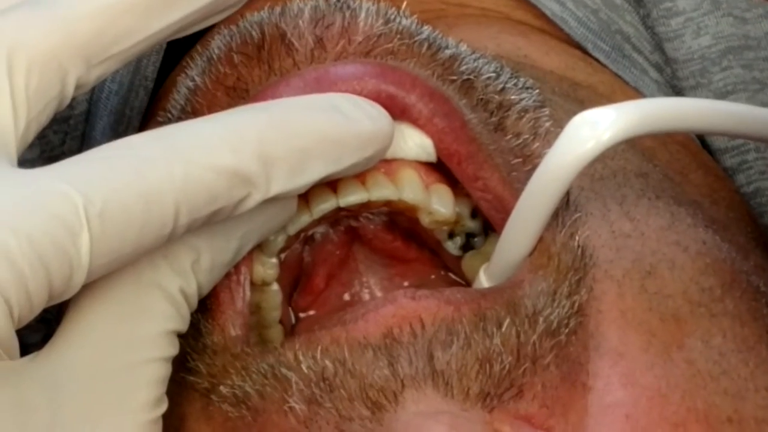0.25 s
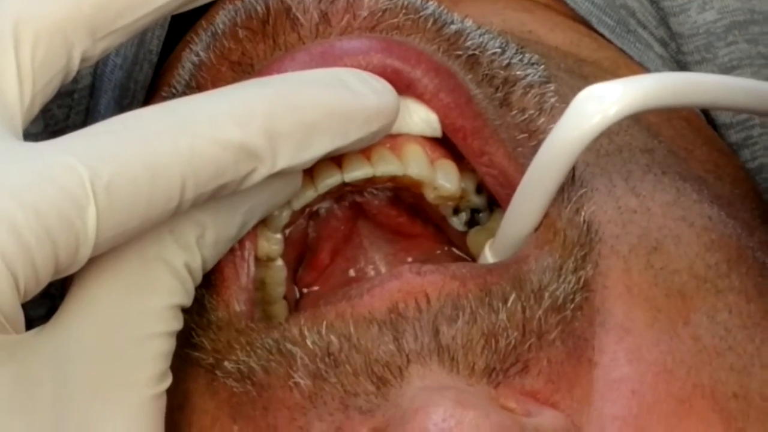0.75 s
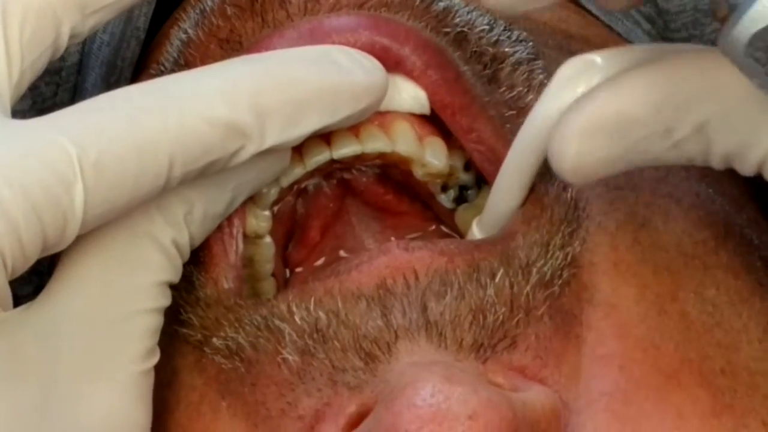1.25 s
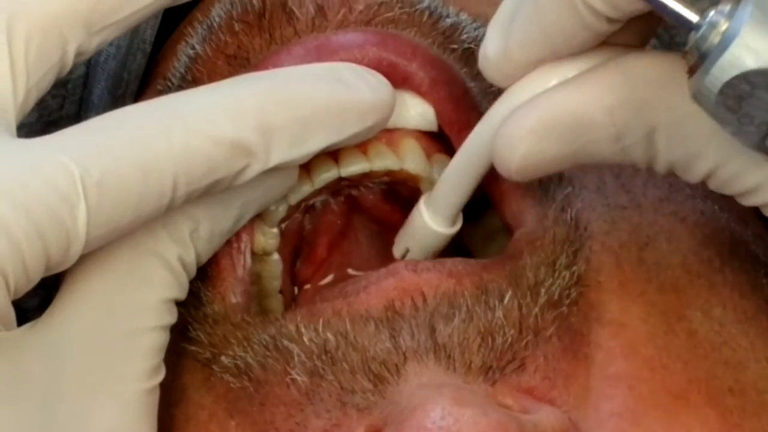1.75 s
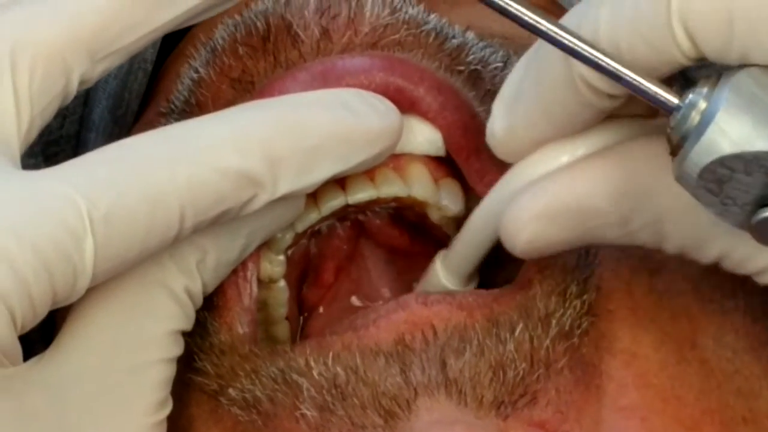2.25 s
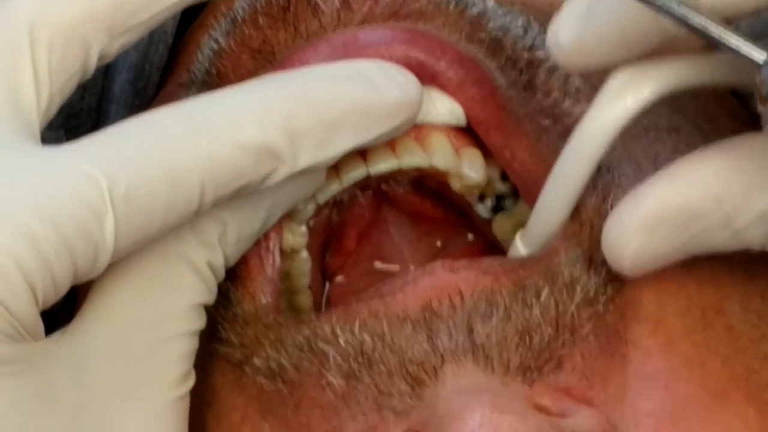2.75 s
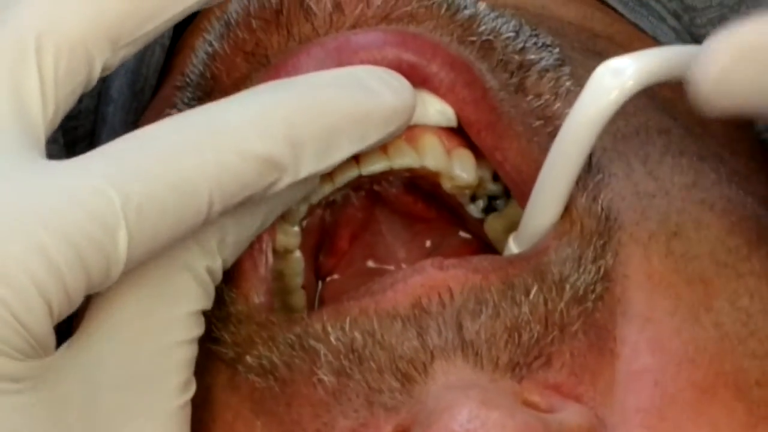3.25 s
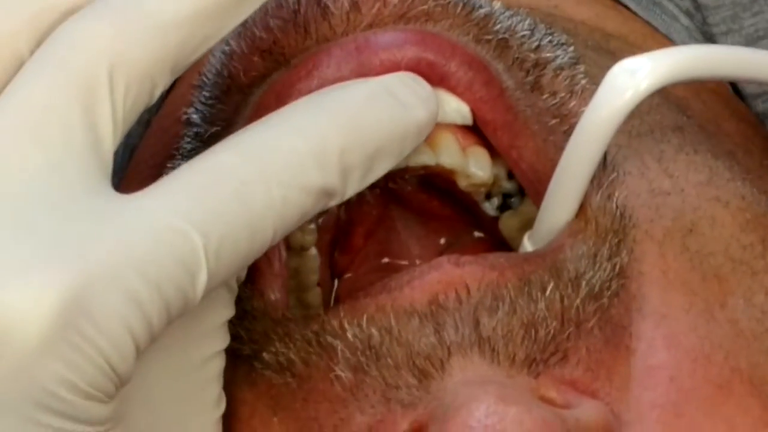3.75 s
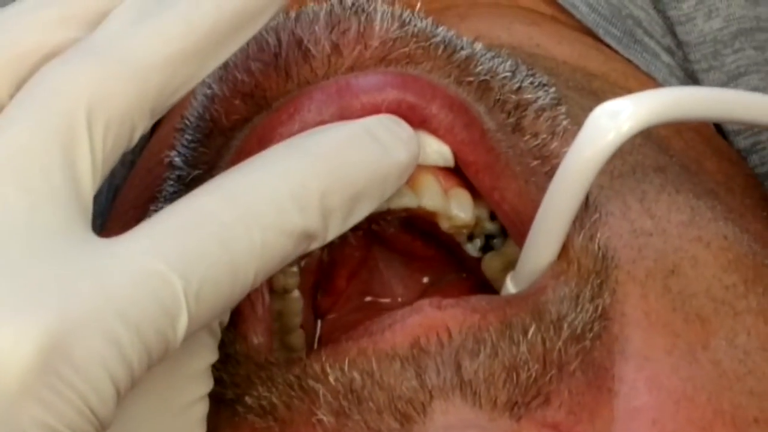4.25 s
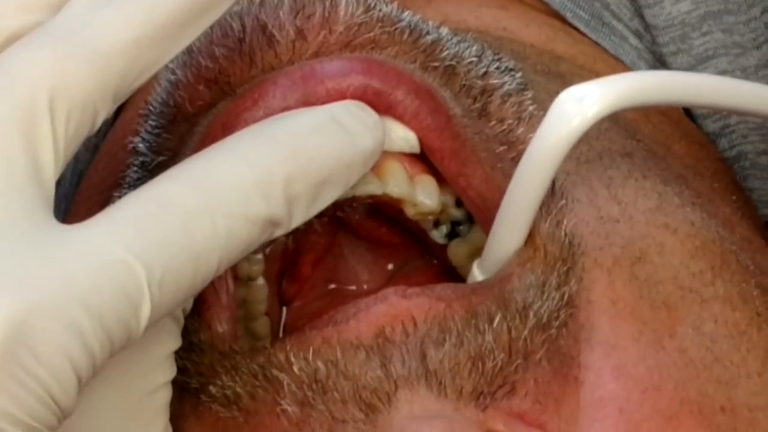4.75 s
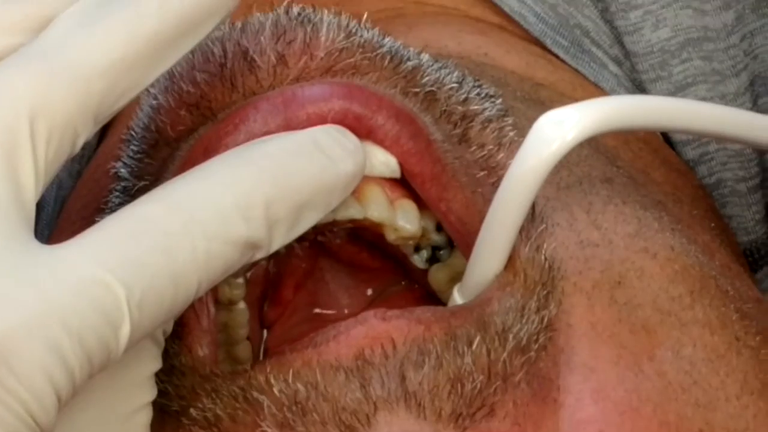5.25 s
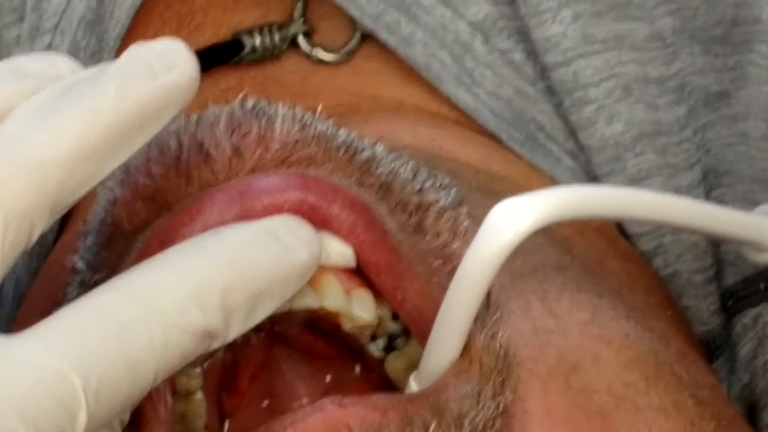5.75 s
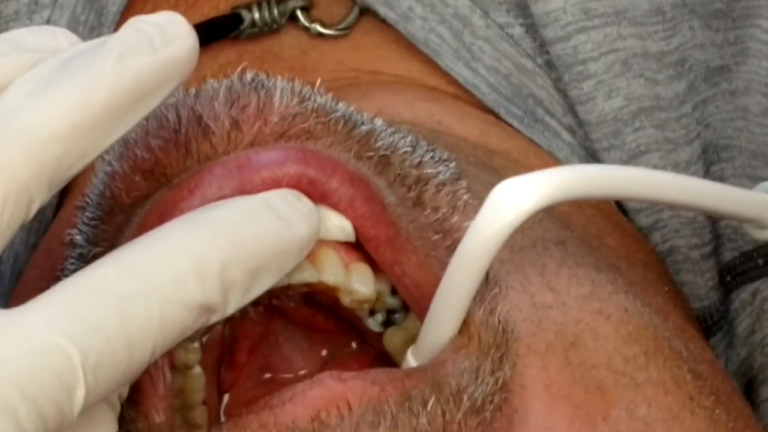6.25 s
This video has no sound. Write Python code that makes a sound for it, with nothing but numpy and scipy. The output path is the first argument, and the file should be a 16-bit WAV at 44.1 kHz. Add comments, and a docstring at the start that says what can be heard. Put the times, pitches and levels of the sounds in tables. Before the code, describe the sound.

Continuous dental suction in a small clinic room, heard very near. Breathy high hiss and a nasal mid-pitched drone run without pause, flecked with saliva crackles. Around two seconds the moved tip shifts in timbre and a low rumble pulses twice; afterwards the sound steadies, slightly duller and wavering. Soft handling thuds cluster after three seconds, over quiet beating fan hum and room rumble.

```python
"""A suction tube hisses in an open mouth: filtered noise stands for air exciting the cavities of mouth and tube.
The tip starts in the cheek over a low drone, is gripped and lifted, is laid back and settles, and each place
has its own colour. Saliva films pop throughout; a low hum swells twice near the lift; fingers bump the
hand-held microphone pair around the move and faintly near the end. Beating sines for fans and a noise rumble
lie behind; hiss, room and fans swell and sink together, the drone with them in part."""
import sys
import numpy as np
from scipy import signal
from scipy.fft import rfft, irfft
from scipy.io import wavfile

SR = 44100
rng = np.random.default_rng(int(sys.argv[2]) if len(sys.argv) > 2 else 0)


def put_to_file(sound):
    """Save the sound as 16-bit audio at rate SR, in the file named by the first command-line argument."""
    columns = np.atleast_2d(sound).T  # one column per channel
    safe = np.clip(columns, -1, 1)
    whole_steps = np.round(safe * 32767)
    wavfile.write(sys.argv[1], SR, whole_steps.astype(np.int16))


N = 287091   # length in samples

# Path of the suction tip. Each row: time in seconds, place (0 cheek, 1 gripped, 2 lifted, 3 laid back,
# 4 settled), hiss level in dB before echoes, dips and swell.
TIP_PATH = [(0, 0.035, -25), (0.3, 0.03, -27.5), (0.85, 0.026, -27), (1.5, 0.067, -27.5),
            (1.63, 0.63, -33.5), (1.8, 1.06, -34.5), (1.98, 1.87, -30.5), (2.33, 2.15, -30),
            (2.47, 2.74, -34.5), (2.62, 2.77, -30), (2.88, 3.14, -32), (3.15, 3.14, -33.5),
            (3.45, 3.8, -32), (5.0, 4.01, -31), (6.51, 3.67, -32)]
# Lowest resonances of tube and mouth with the tip out of the cheek. Each row: pitch in Hz, width of each of two
# resonators in Hz, relative centre level in dB, relative side level in dB, left-right lean in dB.
DRONE_MODES = [(1139, 122, 0.5, -38, 0.5), (1242, 285, 0, -23, 0.74), (1504, 275, -7.5, -16.5, 0.97),
               (1712, 425, -13.5, -29, 1), (2070, 1170, -37, -21.5, 0.1)]


def amp(db):
    """Decibels to amplitude factor."""
    return 10 ** (np.asarray(db) / 20)


def rms_one(x):
    """Scale to an rms of 1."""
    return x / np.sqrt(np.mean(x ** 2) + 1e-20)


def in_time(rows):
    """Join the breakpoints of each column with straight lines over the scene."""
    s, *columns = np.transpose(rows)
    return [np.interp(np.arange(N) / SR, s, c) for c in columns]


def drift(rate_hz, size=N):
    """Random motion of rms 1: noise through two equal one-pole lowpasses, computed every 40 samples."""
    r = np.exp(-80 * np.pi * rate_hz / SR)
    noise = rng.standard_normal(N // 40 + 2002)
    slow = signal.lfilter([1], [1, -2 * r, r * r], noise)[2000:]   # skip the run-in
    return np.interp(np.arange(size) / 40, np.arange(len(slow)), rms_one(slow))


def hiss():
    """Air turbulence at the tip: broad jet noise under cavity colours that fade from place to place."""
    # Resonances for each place of the tip, and the broad noise of the air jet. Each row: pitch in Hz, width of
    # each of two resonators in Hz, relative centre level in dB, relative side level in dB, left-right lean in dB.
    cheek_modes = [(3360, 680, -11.5, -26, 9), (3848, 80, -8, -4, 0), (4430, 480, -41, -8.5, 2),
                   (4510, 68, -9.5, -11, 5), (5253, 600, -1.5, -8.5, 5.5), (5450, 85, -3, -17, 2),
                   (5750, 430, -5, -17, -0.5), (6750, 180, -12, -11, 10), (7340, 1400, -14, -18, 6),
                   (8240, 410, -11.5, -13, -4), (8960, 650, -10.5, -8, 14), (10050, 270, -12.5, -18, 5),
                   (10990, 570, -10, -12, 12), (12500, 900, -22, -24, 0), (13670, 450, -10.5, -12, -10),
                   (14850, 820, -9, -9, -14)]
    gripped_modes = [(2730, 450, -43, -26, 5), (3240, 200, 0.5, -35, -0.0), (3520, 510, -2, -15, -1),
                     (4580, 770, -15, 2, 3), (5740, 980, 0.5, -10, 5), (6660, 530, -11, -2, 8.1),
                     (7430, 270, -2, -13.8, 4.5), (9800, 1200, -11, -7, 6), (10800, 1000, -1, -4, 13),
                     (11800, 550, -17, -16.5, -3.5), (13300, 1100, -4, -7, -1), (14500, 550, -9, -8, -9),
                     (15000, 800, -4, -6, -14)]
    lifted_modes = [(3345, 440, -0.5, -35, -2), (4320, 300, -1, 6, 1), (5760, 830, 3, -5, 1),
                    (6850, 520, -10, 1, 20), (7420, 1550, -0.5, -8, 9), (8600, 1300, -19, -4, 3),
                    (9000, 580, -5, -7.9, 8), (9700, 380, -9, -7, -1), (10400, 890, -1, -3, 13),
                    (12200, 750, -8, -15.8, -2.6), (13200, 440, -20, -13, -3), (13100, 500, -12, -10, -0.5),
                    (14400, 530, -1, 0, -7)]
    laid_back_modes = [(3600, 1430, -7.5, -42, 6), (4130, 500, -33, -1.5, 11), (5256, 650, 4, -2, 6),
                       (5750, 1900, -19, -12, -7), (6400, 1130, -6, -14, 2), (8450, 2300, -11.5, -6, 3.5),
                       (9200, 610, -7, -7, 6), (11100, 620, -10, -9.0, 3), (12070, 520, -27, -17.4, -3.3),
                       (12550, 540, -8, -15, -0.7), (14580, 1400, -1, -2, -12)]
    settled_modes = [(2620, 240, -21.5, -31, 23), (3320, 740, -15.5, -35, 13), (3871, 133, -7, -16, 1),
                     (3910, 360, -26, -14, 4), (4220, 330, -5, -3, 3), (5170, 605, 1.2, -8, 2.5),
                     (5640, 120, -11, -16, 1), (5760, 390, -18.5, -9, -13), (6830, 100, -8, -16, 3),
                     (7360, 500, -12.5, -22, -3), (8390, 1600, -10.5, -12, 2.5),
                     (10480, 400, -16.5, -17, 6), (10990, 380, -12.5, -15, 3), (12080, 460, -12.5, -12, -7),
                     (12600, 510, -15, -16, -4), (13860, 550, -12, -14, 1), (14700, 1000, -15, -13, -5)]
    jet_bands = [(6370, 920, -22, 3, -6), (7890, 1300, 3.5, -1, 6), (10000, 3200, 0, 0, 2.5),
                 (12500, 3700, -7, -6, 1), (15300, 1500, -16, -7, -8)]

    place, level_db = in_time(TIP_PATH)
    out = amp(-9) * cavities(jet_bands, flicker_db=0.5, rate_hz=6.1, own=0.7)
    places = [cheek_modes, gripped_modes, lifted_modes, laid_back_modes, settled_modes]
    for k, modes in enumerate(places):
        share = np.clip(1 - np.abs(place - k), 0, 1)
        heard = share > 0
        colour = cavities(modes, flicker_db=0.56, rate_hz=15, own=2.03, size=heard.sum(), laid_down=k > 2)
        out[:, heard] += np.sqrt(share[heard]) * colour
    return amp(level_db) * nearby(out, place)


def cavities(modes, flicker_db, rate_hz, own, size=N, laid_down=False):
    """Turbulence through flickering resonances as (centre, side), centre rms 1; a shared part leans left or right."""
    # Quarter-cycle link of side to centre, ahead if positive. Each row: pitch in Hz, share before the tube
    # is laid back, share from then on.
    phase_lead = [(1500, 0, 0), (2000, .5, .5), (3300, 0, 0), (3900, -.5, -.5), (4900, .6, .6),
                  (5500, .3, .4), (7000, -.5, -.4), (8200, .6, .6), (9000, 0, 0), (9700, -.8, -.6),
                  (11200, -.8, -.3), (12500, -.5, .6), (14000, -.6, .5), (15500, 0, 0)]

    out, together = np.zeros((2, size)), drift(rate_hz, size)
    white = rng.standard_normal((2, N))
    ahead = irfft(1j * rfft(white[0]), N)   # every pitch a quarter cycle early
    lead_hz, early_share, late_share = np.transpose(phase_lead)
    lead_share = late_share if laid_down else early_share
    for k, (hz, width_hz, centre_db, side_db, lean_db) in enumerate(modes):
        q = np.interp(hz, lead_hz, lead_share)
        pair = np.array([white[0], q * ahead + np.sqrt(1 - q * q) * white[1]])
        pair = np.roll(pair, 9973 * k, axis=1)[:, :size]   # a different stretch of noise for each mode
        one, other = resonance(pair, hz, width_hz)
        # share of the centre noise in the side that gives the lean
        lean = np.tanh(lean_db * np.log(10) / 20)
        shared = np.clip(lean * np.cosh((centre_db - side_db) * np.log(10) / 20), -.99, .99)
        side = shared * one + np.sqrt(1 - shared ** 2) * other
        gain = amp(flicker_db * (together + own * drift(rate_hz, size)))
        out += gain * [amp(centre_db) * one, amp(side_db) * side]
    return out / np.std(out[0])


def resonance(x, hz, width_hz):
    """Two equal resonators in a row, gain 1 on top."""
    b, a = signal.iirpeak(hz, hz / width_hz, SR)
    return signal.lfilter(np.convolve(b, b), np.convolve(a, a), x)


def nearby(x, place):
    """Short reflections ripple the spectrum finely; the ripple glides with the tip and wanders."""
    # Face, hands and lamp reflect the hiss. Each row: delay in seconds with the tip in the cheek, level in dB.
    reflections = [(.0013, -16), (.0027, -16), (.0046, -16), (.0071, -18)]
    stretch_per_place, wander_s = .04, .00002

    out, t = x.copy(), np.arange(N) / SR
    for delay_s, level_db in reflections:
        late = t - delay_s * (1 + stretch_per_place * place) - wander_s * drift(0.63)
        out += amp(level_db) * np.array([np.interp(late, t, v) for v in x])
    return out


def drone(swell_db):
    """The lowest resonances of tube and mouth crossfade to another set as the tip leaves the cheek."""
    # Resonances with the tip in the cheek. Each row: pitch in Hz, width of each of two resonators in Hz,
    # relative centre level in dB, relative side level in dB, left-right lean in dB.
    cheek_drone = [(1196, 290, -11.5, -38, 0.5), (1257, 168, 1, -22, 0.67), (1475, 335, -6, -15.5, 0.97),
                   (1780, 260, -15, -32, 1), (2250, 1000, -29, -22.5, 0.1)]
    base_db, swell_share = -33, 0.81

    moved = np.clip(in_time(TIP_PATH)[0], 0, 1)
    in_cheek = cavities(cheek_drone, flicker_db=0.9, rate_hz=110, own=0.75)
    in_open = cavities(DRONE_MODES, flicker_db=0.9, rate_hz=110, own=0.75)
    level_db = base_db + swell_share * swell_db + 0.91 * drift(5.6)
    return amp(level_db) * (np.sqrt(1 - moved) * in_cheek + np.sqrt(moved) * in_open)


def pops(per_s, level_db):
    """Saliva films burst at the tip and ring the drone resonances: a few loud ones, many small."""
    # Loud bursts. Each row: time in seconds, peak in dB before the dips.
    loud_bursts = [(0.7948, -21), (1.263, -25), (1.565, -22), (1.7917, -25), (1.8634, -19.5), (2.028, -22),
                   (2.554, -24), (2.7809, -19), (2.8349, -21), (3.2461, -23), (3.7189, -24),
                   (3.8035, -23.5), (4.0483, -19.5), (4.376, -25), (4.412, -21), (4.48, -30), (4.8693, -18),
                   (5.361, -19), (5.5361, -20), (5.6868, -28), (5.804, -19), (5.84, -19)]

    sizes = amp(level_db + 1.5 * np.minimum(rng.exponential(1, N), 3)) * rng.choice([-1, 1], N)
    clicks = sizes * (rng.random(N) < per_s / SR)
    for s, peak_db in loud_bursts:
        clicks[round(s * SR)] = amp(peak_db)
    pulse = signal.unit_impulse(SR // 20)
    ring = np.zeros(len(pulse))
    for k, (hz, width_hz, centre_db, _, _) in enumerate(DRONE_MODES):
        ring += (-1) ** k * amp(centre_db) * resonance(pulse, hz, width_hz)   # alternating sign
    ringing = signal.fftconvolve(clicks, ring / np.abs(ring).max())[:N]
    return ringing * amp([[0], [-18]])   # centre, side


def dips(centre, side):
    """Dips at some pitches in centre and side, then changing gaps in the centre."""
    # Fixed dips of each. Each row: pitch in Hz, width in Hz, depth in dB.
    centre_dips = [(1061, 112, -8.5)]
    side_dips = [(3370, 190, -41), (1110, 110, -10)]
    return np.array([changing_gaps(reject(centre, centre_dips)), reject(side, side_dips)])


def reject(x, nulls):
    """Steep-sided dips of limited depth."""
    bins = np.fft.rfftfreq(N, 1 / SR)
    loss_db = sum(depth_db / (1 + (2 * (bins - hz) / width_hz) ** 4) for hz, width_hz, depth_db in nulls)
    return irfft(rfft(x) * amp(loss_db), N)


def changing_gaps(x):
    """Narrow bands drop out; pitches, widths and depths change along a table, with random edges and partial fills."""
    # Gaps in the spectrum. Each row: position on the place scale of the tip path, then for each of four gaps
    # its pitch in Hz, mean width in Hz and full depth in dB.
    gap_table = [(0, 2250, 380, -55, 4220, 400, -55, 4900, 200, -1, 6330, 300, -14),
                 (1, 2280, 440, -55, 4150, 320, -55, 4850, 180, -20, 6330, 300, -18),
                 (2, 2280, 440, -55, 4120, 280, -50, 4900, 220, -40, 6300, 220, -16),
                 (2.4, 2280, 420, -55, 4340, 520, -55, 4900, 200, -1, 6330, 250, -10),
                 (4, 2200, 300, -55, 4350, 520, -55, 4900, 200, -1, 6350, 330, -35)]
    # One value for each gap: share of the time in which it is partly filled.
    filled_shares = [.01, .1, .4, .3]
    edge_wander, wander_hz = .13, 7.   # edge motion as a share of the width, and its rate

    hz, s, spectra = signal.stft(x, SR, nperseg=1024)
    at = np.minimum((s * SR).astype(int), N - 1)
    position, *columns = np.transpose(gap_table)
    position_now = in_time(TIP_PATH)[0][at]
    now = [np.interp(position_now, position, c) for c in columns]
    loss_db = 0
    for centre_hz, width_hz, depth_db, filled in zip(now[::3], now[1::3], now[2::3], filled_shares):
        low = centre_hz - .5 * width_hz * np.exp(2 * edge_wander * drift(wander_hz)[at])
        high = centre_hz + .5 * width_hz * np.exp(2 * edge_wander * drift(wander_hz)[at])
        chance = drift(wander_hz)[at]
        # a filled gap keeps a fifth of its depth
        is_open = np.clip(8 * (chance - np.quantile(chance, filled)), .2, 1)
        shape = 1 / (1 + ((2 * hz[:, None] - low - high) / (high - low)) ** 8)
        loss_db = loss_db + is_open * depth_db * shape
    return signal.istft(spectra * amp(loss_db), SR)[1][:N]


def bumps():
    """Fingers push the casing and its ports in opposite directions: damped thuds, mostly in the side."""
    # Fingers shift on the casing. Each row: time in seconds, strength in dB before filtering.
    finger_shifts = [(1.279, -34), (2.958, -38), (2.999, -32), (3.026, -33), (3.056, -32), (3.092, -32),
                     (3.125, -28), (3.245, -22), (3.27, -31), (3.3, -25), (3.506, -24), (3.53, -33),
                     (3.56, -35), (3.605, -34), (3.627, -34), (3.65, -31), (3.665, -28), (3.7, -35),
                     (3.745, -35), (3.785, -35), (3.882, -21), (3.912, -23), (5.09, -40), (5.32, -40),
                     (5.39, -35), (5.53, -39), (5.78, -33), (6.41, -40)]
    thud_hz, t60_s, tick_db = 126, 0.042, 14   # the tick is the bare contact under each thud

    clicks = np.full(N, 1e-18)
    for s, level_db in finger_shifts:
        clicks[round(s * SR)] = amp(level_db)
    r, w = amp(-60 / (t60_s * SR)), 2 * np.pi * thud_hz / SR
    thud = signal.lfilter([0, np.sin(w)], [1, -2 * r * np.cos(w), r * r], clicks)
    thud -= amp(tick_db) * clicks
    thud = signal.sosfilt(signal.butter(2, [56, 640], "band", fs=SR, output="sos"), thud)
    return thud * amp([[-18], [1.5]])   # centre, side


def hum():
    """A narrow band of noise around a gliding low pitch, its side a quarter cycle from its centre."""
    # A low rumble swells twice and goes. Each row: time in seconds, pitch in Hz, centre level in dB.
    rumble_path = [(0, 191, -80), (1.7, 190, -75), (1.97, 190.3, -52), (2.1, 190, -54), (2.25, 191.7, -44),
                   (2.36, 199.8, -52), (2.5, 200, -75), (6.51, 202, -80)]

    hz, level_db = in_time(rumble_path)
    phase = 2 * np.pi * np.cumsum(hz) / SR
    a, b = drift(14), drift(14)   # these set the width of the band
    centre = a * np.sin(phase) + b * np.cos(phase)
    side = a * np.cos(phase) - b * np.sin(phase)
    return amp(level_db) * [centre, amp(-5.0) * side]


def fans():
    """Three fans as slowly wandering sines that beat, with some of each in the side."""
    # Fan tones. Each row: distance from the loudest in Hz, share of its drift, centre level in dB before the swell.
    fan_tones = [(-12.5, 0.53, -54), (0, 1, -48.5), (7.5, 0.4, -52.5)]
    # The loudest fan drifts in speed. Each row: time in seconds, pitch in Hz.
    speed_path = [(0.0, 457.5), (1.12, 458.8), (4.49, 455.7), (6.25, 460.8), (6.5, 459.4)]

    out, (lead_hz,) = np.zeros((2, N)), in_time(speed_path)
    for apart_hz, share, level_db in fan_tones:
        hz = lead_hz.mean() + apart_hz + share * (lead_hz - lead_hz.mean())
        phase = 2 * np.pi * np.cumsum(hz) / SR + rng.uniform(0, 2 * np.pi)
        gain = np.sqrt(2) * amp(level_db + 1.05 * drift(6.1))
        out += gain * [np.sin(phase), amp(-7.0) * np.cos(phase)]
    return out


def room(level_db):
    """Ventilation rumble as shaped noise, with standing waves as narrow resonances."""
    # Rumble spectra of centre and side. Each row: pitch in Hz, relative density in dB per Hz.
    centre_spectrum = [(15, -66), (25, -35), (86, -16.5), (140, -13), (190, -9.5), (273, -8.5),
                       (346, -11.5), (381, -10.5), (453, -7.5), (491, -7.5), (1100, -12), (1430, -42),
                       (2420, -120)]
    side_spectrum = [(15, -57), (25, -33), (86, -5.5), (248, -11), (419, -7.5), (453, -10), (491, -9),
                     (539, -14.5), (1100, -19.5), (1430, -53), (2420, -120)]
    # Standing waves. Each row: pitch in Hz, width of each of two resonators in Hz, relative centre level in dB,
    # relative side level in dB, left-right lean in dB.
    standing_waves = [(175.6, 10.5, -11, -15.5, 0), (240.3, 13, -12, -13, -5), (340.4, 39, -13, -17, -3),
                      (621.5, 12.7, -15.5, -19, 15), (956, 45, -16, -29, 0)]

    rumble = np.array([coloured(centre_spectrum), amp(-7.5) * coloured(side_spectrum)])
    waves = cavities(standing_waves, flicker_db=0.5, rate_hz=0.33, own=0.5)
    return amp(level_db) * (amp(3.0) * rumble + amp(-1.0) * waves)


def coloured(spectrum):
    """Steady noise of a given spectrum, rms 1."""
    hz, db = np.transpose(spectrum)
    bins = np.maximum(np.fft.rfftfreq(N, 1 / SR), 1)
    gain = amp(np.interp(np.log(bins), np.log(hz), db, right=-90))
    return rms_one(irfft(rfft(rng.standard_normal(N)) * gain, N))


def scene():
    """Layers are mixed as centre and side, then spread to left and right."""
    # Common swell of hiss, room and fans. Each row: time in seconds, level in dB.
    swell_path = [(0, -2.5), (0.7, -2.5), (1.1, -2), (1.55, -3.5), (2.0, 1), (2.3, 0.5), (2.48, 0),
                  (2.9, -2.5), (3.3, 1.5), (4.25, 1.5), (4.4, 0), (4.55, 2.5), (4.62, -2), (5.0, 0.5),
                  (5.35, 1), (6.0, 2), (6.1, 0), (6.51, 0)]

    swell_db, = in_time(swell_path)
    swell = amp(swell_db)
    mouth_and_room = swell * (hiss() + room(-47.5)) + drone(swell_db) + pops(per_s=59.0, level_db=-35.0)
    centre, side = dips(*mouth_and_room) + swell * fans() + hum() + bumps()
    return np.array([centre + side, centre - side])


def record(dry):
    """A steep lowpass cuts the top above 15.5 kHz."""
    return signal.sosfilt(signal.ellip(14, .5, 70, 15500, fs=SR, output="sos"), dry)


dry = scene()
out = record(dry)
put_to_file(out)
```